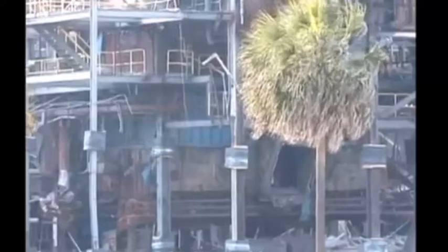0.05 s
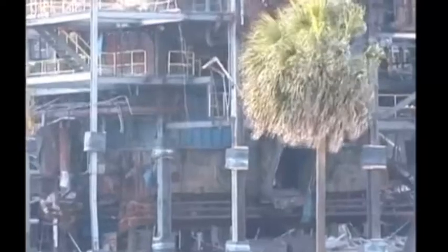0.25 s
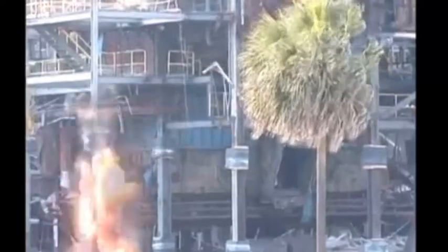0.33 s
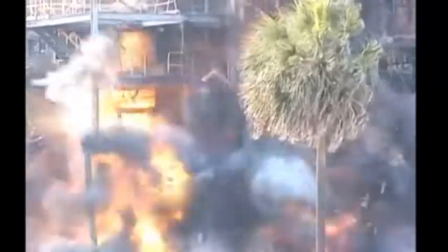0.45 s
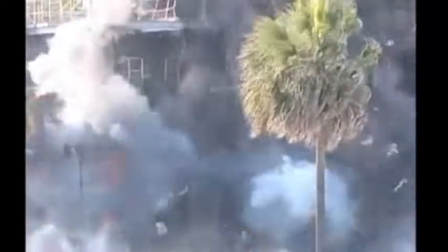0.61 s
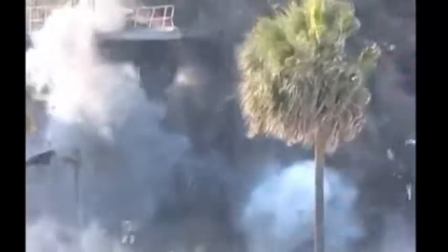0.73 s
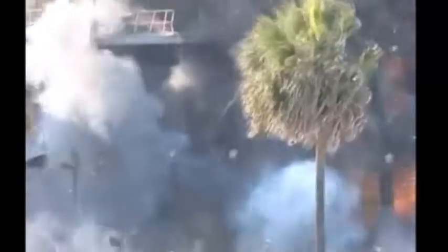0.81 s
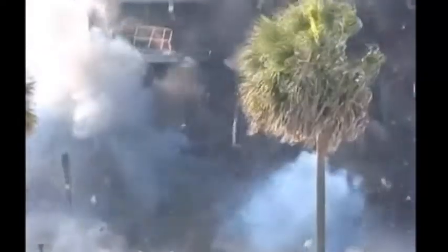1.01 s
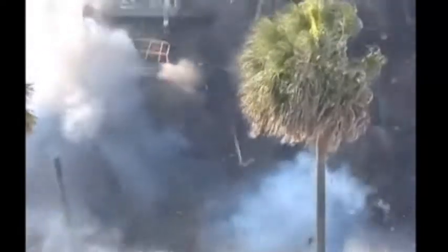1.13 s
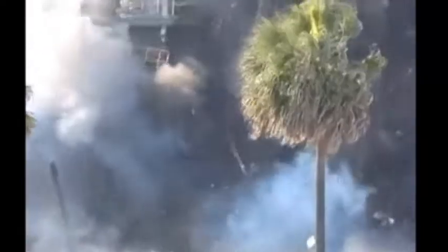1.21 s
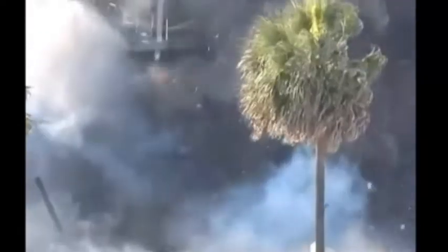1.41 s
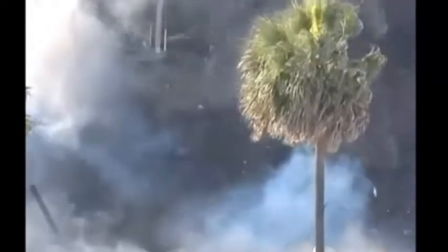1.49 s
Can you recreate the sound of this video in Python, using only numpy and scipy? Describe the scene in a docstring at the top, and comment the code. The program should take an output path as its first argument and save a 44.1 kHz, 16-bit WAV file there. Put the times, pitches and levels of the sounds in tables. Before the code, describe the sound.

Silence until about 0.2 s, then demolition charges explode: a split-second tonal swell, a very sharp crack and a dense ragged volley until 0.3 s, with heavy bass thumps. Weaker cracks and crunches continue to 0.55 s over strong rumble and hollow boom. Another snapping shock lands near 0.69 s. Dull thuds and breaking knocks follow until 1.1 s, while the outdoor roar fades beneath hissing rubble to 1.5 s.

```python
"""Demolition charges go off in a steel plant, heard outdoors from a distance: a brief swell of wavering
tones leads into a ragged volley of sharp reports and blunt bursts, made of enveloped, filtered noise.
Damped sine pressure waves thump through the heavy rumble and boom of low filtered noise; one shock front
is a dispersed pulse. The volley sinks into the roar of the blast's echo and the hiss of falling rubble,
both made of noise grains of uneven size."""
import sys
import numpy as np
from scipy import signal
from scipy.fft import rfft, irfft, next_fast_len
from scipy.io import wavfile
from scipy.ndimage import uniform_filter1d

SR = 44100
rng = np.random.default_rng(int(sys.argv[2]) if len(sys.argv) > 2 else 0)


def persist_wave(psi):
    """Save psi, clipped to +-1, as 16-bit WAV."""
    counts = np.round(np.clip(psi, -1, 1) * 32767).astype(np.int16)
    wavfile.write(sys.argv[1], SR, np.atleast_2d(counts).T)


N = 68355

# Tones of the brief opening swell: pitch_hz, level_db
SWELL_TONES = [(185, -24), (340, -26.5), (808, -12), (985, -23), (1086, -15), (1995, -18.5), (2085, -19),
               (2710, -24.5), (2820, -17), (3050, -18.5)]
# Level of the deep rumble: time_s, level_db; its spectrum: frequency_hz, relative_db
RUMBLE_LEVEL = [(.215, -55), (0.239, -22.5), (.30, -23), (.39, -25.5), (.47, -23), (.60, -23), (.635, -40),
                (.70, -31), (.81, -38), (.90, -30.5), (1.0, -41), (1.12, -39), (1.33, -40.5), (1.42, -44),
                (1.55, -44.5)]
RUMBLE_SPECTRUM = [(15, -46.5), (28, -24.5), (45, -4), (64, 3), (95, -0.5), (125, -7), (170, -20.5),
                   (400, -49.5), (8000, -130)]
# Level of the structure's hollow boom: time_s, level_db; its spectrum: frequency_hz, relative_db
BOOM_LEVEL = [(.2, -40.5), (.23, -23.5), (.29, -23.5), (.34, -30), (.56, -30), (.65, -37.5), (.78, -41),
              (.93, -40), (1.1, -48.5), (1.55, -52)]
BOOM_SPECTRUM = [(40, -35), (100, -10), (130, 1.5), (160, 2), (200, -5), (240, -13), (400, -23.5),
                 (900, -50.5), (8000, -110)]
# Level of the roar among the steelwork: time_s, level_db; its spectrum: frequency_hz, relative_db
ROAR_LEVEL = [(.195, -44), (.22, -33), (.275, -40), (.30, -38.5), (.355, -42), (.385, -42), (.45, -40.5),
              (.485, -48), (.515, -36), (.55, -42.5), (.72, -43), (1.05, -44.5), (1.3, -47.5),
              (1.55, -51.5)]
ROAR_SPECTRUM = [(100, -13), (280, -0.5), (580, -1), (1100, 1), (2200, -4.5), (3500, -9), (5500, -20),
                 (8000, -28.5), (11000, -47.5), (16000, -63)]
# Level of the volley's fine crackle: time_s, level_db; its spectrum: frequency_hz, relative_db
CRACKLE_LEVEL = [(.195, -55), (.225, -44), (.275, -49.5), (.29, -53.5), (.33, -45.5), (.355, -55.5),
                 (.44, -54), (.48, -62), (.525, -52.5), (.56, -58), (.72, -67), (.9, -92)]
CRACKLE_SPECTRUM = [(1500, -13), (4500, 5.5), (8000, -3), (11000, -9), (16000, -19)]
# Level of the falling grit: time_s, level_db; its spectrum: frequency_hz, relative_db
GRIT_LEVEL = [(.2, -62), (.6, -50.5), (.85, -54), (1.12, -46.5), (1.42, -52), (1.55, -48)]
GRIT_SPECTRUM = [(600, -13.5), (1500, -4), (2800, -1.5), (5000, -6), (6300, -16.5), (8200, -25),
                 (10000, -38), (16000, -58)]
# Reports of charges and snapping steel: start_s, envelope_peak_db, decay_s, tilt_db_per_octave
REPORT_EVENTS = [(0.2166, -10, 0.00071, 4.5), (0.2265, -26.5, 0.0036, 3), (0.2438, -22, 0.0035, -6.5),
                 (0.2565, -20.5, .0022, 1), (0.2601, -23, 0.0006, -4), (0.2659, -23, 0.0026, 0.5),
                 (0.2809, -27.5, 0.0018, 1), (0.2872, -25.5, .0006, 1.5), (.3670, -22.5, 0.0027, -0.2),
                 (0.397, -29, 0.0027, -4.5), (0.4103, -20.5, .0005, 1.5), (0.4219, -26, .0015, -3.5),
                 (0.4401, -31.5, .003, -1), (0.5167, -30.5, 0.0024, -0.5), (.5322, -28, 0.0023, -2)]
# Spectrum of a report before its tilt: frequency_hz, relative_db
REPORT_SPECTRUM = [(100, -22.5), (350, -0.5), (1500, 3.5), (3000, -0.5), (5300, -7.5), (6600, -13.5),
                   (8000, -12.5), (10300, -19.5), (13000, -19.5), (16000, -23)]
# Blunt bursts of breaking structure: start_s, envelope_peak_db, decay_s, centre_hz
BURST_EVENTS = [(0.2169, -19.5, 0.0035, 486), (.2650, -23.5, .005, 620), (.3300, -33, 0.011, 1450),
                (0.4212, -42, 0.0057, 1010), (0.443, -33, 0.014, 517), (.5060, -32.5, 0.005, 3460),
                (.5170, -32.5, 0.0077, 2530), (0.53, -32.5, 0.0045, 980), (.6400, -39.5, 0.052, 280),
                (0.662, -37.5, 0.0089, 1680), (0.6855, -31.5, 0.0048, 383), (.8140, -39.5, 0.0094, 1390),
                (0.833, -30, 0.0032, 1090), (.9610, -35, 0.0026, 710), (1.0354, -34, 0.008, 1200),
                (1.0800, -37.5, 0.0051, 1240)]
# Pressure waves: start_s, level_db, pitch_hz
THUMP_EVENTS = [(.2220, -18.5, 180), (0.2393, -19, 89), (0.2616, -14.5, 184), (0.2788, -8, 105),
                (.4660, -19.5, 73), (0.669, -22, 85), (.7590, -23, 70), (.8890, -22.5, 91),
                (.9530, -22.5, 100), (1.0160, -27, 111), (1.3450, -27.5, 75), (1.5250, -31.5, 83.5)]
# Spectrum of the shock front: frequency_hz, relative_db
SHOCK_SPECTRUM = [(120, -24), (400, 0), (1120, 0.5), (2500, -2), (6600, -12), (9750, -27), (16000, -51)]

BLAST_S, ONSET_S = 0.1908, 0.0067  # start and fade-in time of the continuous layers
SWELL_PEAK_S, SWELL_RISE_S, SWELL_FALL_S = 0.2148, 0.0054, 0.0018
SWELL_WAVER = 0.015  # rms pitch deviation, as a fraction
ROAR_SCATTER_DB, ROAR_FLUTTER_DB = 3.5, 1
CRACKLE_SCATTER_DB, CRACKLE_FLUTTER_DB = 8, 3
REPORT_ATTACK_S = 0.00019
BURST_WIDTH, BURST_ATTACK_S = 0.73, 0.0011  # width sets the band edges as ratios to the centre
THUMP_CYCLES = 0.97  # cycles until the amplitude falls to 1/e
SHOCK_S, SHOCK_DB, SHOCK_SPREAD_HZ = 0.6851, -15.5, 890
LOW_CUT_HZ, TOP_HZ = 26, 15900
OVERLOAD = 0.87  # amplitude at which the microphone saturates


def undb(db):
    """Amplitude gain is ten to the power of decibels over twenty."""
    return 10 ** (np.asarray(db) / 20)


def unit(x):
    """Normalisation: dividing by the rms gives unit mean power."""
    return x / np.sqrt(np.mean(x ** 2))


def match(x, envelope):
    """Energy matching: the sound is scaled to the total energy of its envelope."""
    return x * np.sqrt(np.sum(envelope ** 2) / (np.sum(x ** 2) + 1e-18))


def colour(x, spectrum):
    """Minimum-phase filtering: a folded cepstrum turns a magnitude curve into a causal filter."""
    hz, db = np.array(spectrum, float).T
    size = 2 * next_fast_len(N)
    f = np.maximum(np.arange(size // 2 + 1) * SR / size, 1)
    magnitude = undb(np.interp(np.log(f), np.log(hz), db))
    cepstrum = irfft(np.log(magnitude))
    # fold the negative-time half onto the positive
    cepstrum[1:size // 2] *= 2
    cepstrum[size // 2 + 1:] = 0
    response = np.exp(rfft(cepstrum))
    return irfft(rfft(x, size) * response)[:N]


def fader(t, curve):
    """Amplitude envelope: gain is interpolated in decibels and opens with the blast."""
    onset = np.clip((t - BLAST_S) / ONSET_S, 0, 1)
    return undb(np.interp(t, *np.array(curve).T)) * onset


def smooth_twice(x, width):
    """Low-pass smoothing: two successive moving averages."""
    return uniform_filter1d(uniform_filter1d(x, width), width)


def drift(rate_hz):
    """Slow fluctuation: held random values are smoothed and scaled to rms 1."""
    hold = max(int(SR / rate_hz), 1)
    values = rng.standard_normal(N)[:N // hold + 1]
    return unit(smooth_twice(np.repeat(values, hold)[:N], hold))


def grains(scatter_db):
    """Shot noise: a dense hail of tiny impacts has log-normally scattered sizes, limited to 3 sigma."""
    impacts = rng.standard_normal(N)
    sizes = undb(scatter_db * np.clip(rng.standard_normal(N), -3, 3))
    return impacts * sizes


def strike(t, start, attack, decay):
    """Impulsive excitation: a linear rise precedes an exponential fall."""
    age = np.maximum(t - start, 0)
    rise = np.minimum(age / attack, 1)
    return rise * np.exp(-np.maximum(age - attack, 0) / decay)


def roll(spectrum, even_s):
    """Level equalisation: filtered noise is divided by its own running rms."""
    noise = colour(rng.standard_normal(N), spectrum)
    power = smooth_twice(noise ** 2, int(even_s * SR))
    return noise / np.sqrt(power + 1e-12)


def opening_swell(t):
    """Additive synthesis: frequency-modulated tones swell for a few milliseconds, then break off."""
    rising = (t - SWELL_PEAK_S) / SWELL_RISE_S
    falling = (SWELL_PEAK_S - t) / SWELL_FALL_S
    envelope = np.exp(np.minimum(rising, falling)) * (t > BLAST_S)
    tones = 0
    for hz, db in SWELL_TONES:
        pitch = hz * (1 + SWELL_WAVER * drift(400))
        cycles = np.cumsum(pitch / SR) + rng.random()
        tones = tones + undb(db) * np.sin(2 * np.pi * cycles)
    return envelope * tones


def rumble(t):
    """Low-frequency band noise: a deep, heavy roll of evened level."""
    return fader(t, RUMBLE_LEVEL) * roll(RUMBLE_SPECTRUM, even_s=0.026)


def boom(t):
    """Low-frequency band noise: the shifting structure booms hollowly, pitched above the rumble."""
    return fader(t, BOOM_LEVEL) * roll(BOOM_SPECTRUM, even_s=0.027)


def roar(t):
    """Diffuse superposition: countless small reflections and breakages form noise of fluttering level."""
    hail = grains(ROAR_SCATTER_DB)
    flutter = undb(ROAR_FLUTTER_DB * drift(130))
    return fader(t, ROAR_LEVEL) * unit(colour(hail * flutter, ROAR_SPECTRUM))


def crackle(t):
    """Uneven shot noise: bright, widely scattered grains flutter and fade with the volley."""
    hail = grains(CRACKLE_SCATTER_DB)
    flutter = undb(CRACKLE_FLUTTER_DB * drift(119.8))
    return fader(t, CRACKLE_LEVEL) * unit(colour(hail * flutter, CRACKLE_SPECTRUM))


def grit(t):
    """Dense shot noise: small impacts of falling grit merge into a hiss."""
    return fader(t, GRIT_LEVEL) * unit(colour(grains(scatter_db=4), GRIT_SPECTRUM))


def reports(t):
    """Broadband impulse: random polarity makes each snap jagged, and a spectral tilt sets its brightness."""
    out = 0
    for start, db, decay, tilt in REPORT_EVENTS:
        spectrum = [(hz, level + tilt * np.log2(hz / 1000)) for hz, level in REPORT_SPECTRUM]
        push = undb(db) * strike(t, start, REPORT_ATTACK_S, decay)
        polarity = np.sign(rng.standard_normal(N))
        out = out + match(colour(push * polarity, spectrum), push)
    return out


def bursts(t):
    """Band-limited noise: each short crunch lies about one centre frequency."""
    out = 0
    ratio = 1 + BURST_WIDTH / 2
    for start, db, decay, hz in BURST_EVENTS:
        band = signal.butter(2, [hz / ratio, hz * ratio], "band", fs=SR, output="sos")
        push = undb(db) * strike(t, start, BURST_ATTACK_S, decay)
        noise = signal.sosfilt(band, rng.standard_normal(N))
        out = out + match(push * noise, push)
    return out


def thumps(t):
    """Damped oscillation: each pressure wave pushes, sucks back and dies within a cycle or two."""
    out = 0
    for start, db, hz in THUMP_EVENTS:
        cycles = np.maximum(t - start, 0) * hz
        damping = np.exp(-(cycles / THUMP_CYCLES) ** 2)
        out = out + undb(db) * np.sin(2 * np.pi * cycles) * damping
    return out


def shock():
    """Dispersion: all-pass filters delay a pressure pulse's low notes into a very fast downward chirp."""
    impulse = 1.0 * (np.arange(N) == int(SHOCK_S * SR))
    pulse = colour(impulse, SHOCK_SPECTRUM)
    pole = np.exp(-2 * np.pi * SHOCK_SPREAD_HZ / SR)
    for _ in range(4):
        pulse = signal.lfilter([-pole, 1], [1, -pole], pulse)
    return undb(SHOCK_DB) * pulse / np.abs(pulse).max()


def scene():
    """Linear superposition: the volley, its rumble and the rubble add up in mono."""
    t = np.arange(N) / SR
    volley = opening_swell(t) + reports(t) + bursts(t) + shock() + thumps(t)
    blast = rumble(t) + boom(t) + roar(t)
    rubble = crackle(t) + grit(t)
    return (volley + blast + rubble)[None]


def record(dry):
    """Band limits and saturation: the microphone loses deep bass and rounds peaks; the recorder cuts the top."""
    low_cut = signal.butter(2, LOW_CUT_HZ, "high", fs=SR, output="sos")
    thin = signal.sosfilt(low_cut, dry)
    rounded = thin / (1 + (thin / OVERLOAD) ** 4) ** 0.25
    top_cut = signal.ellip(8, 0.2, 70, TOP_HZ, fs=SR, output="sos")  # ripple and stopband in dB
    return signal.sosfilt(top_cut, rounded)


dry = scene()
out = record(dry)
persist_wave(out)
```